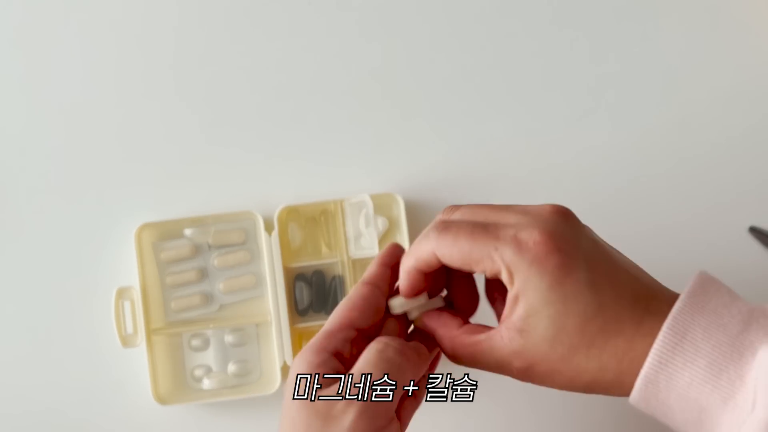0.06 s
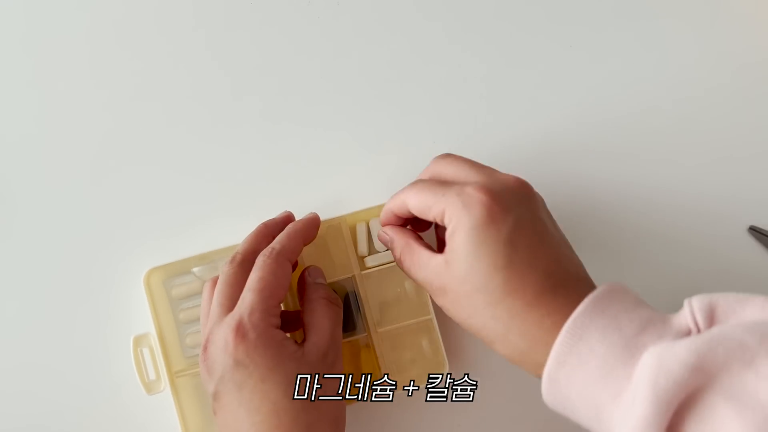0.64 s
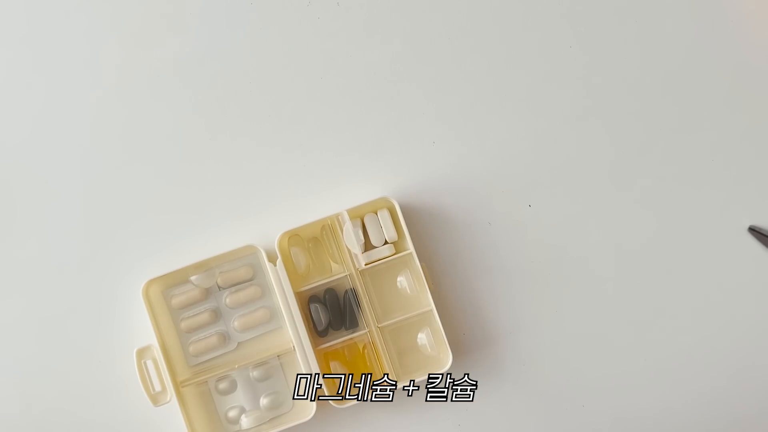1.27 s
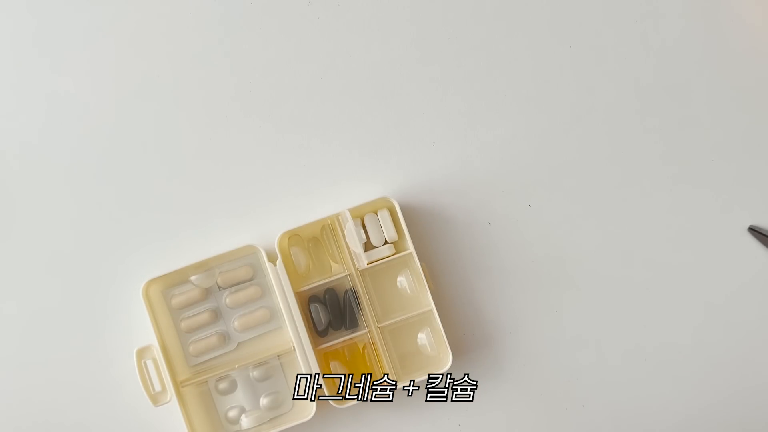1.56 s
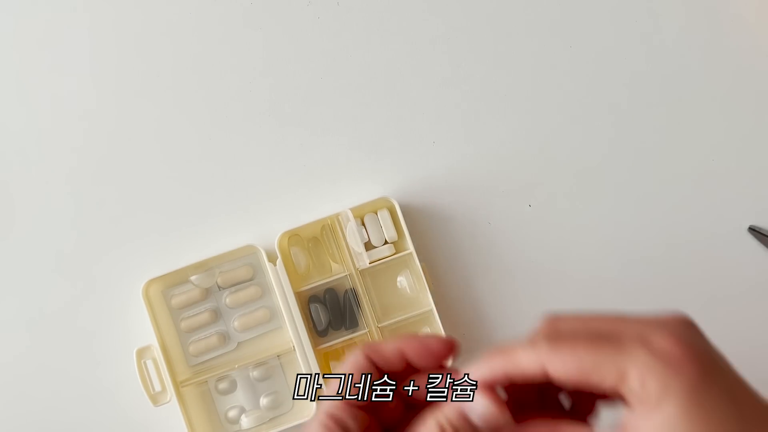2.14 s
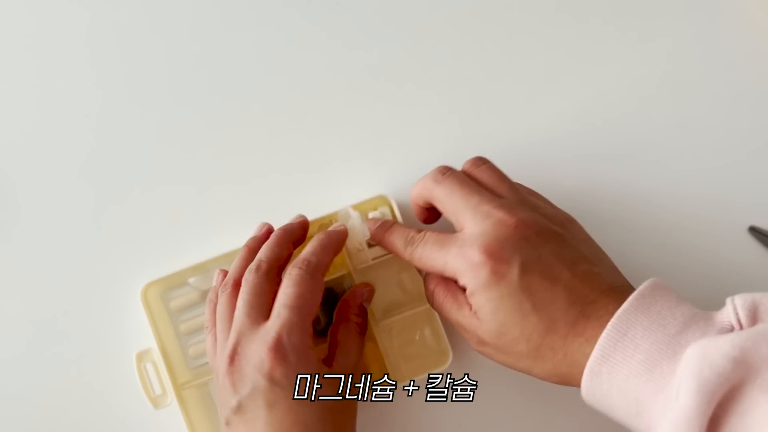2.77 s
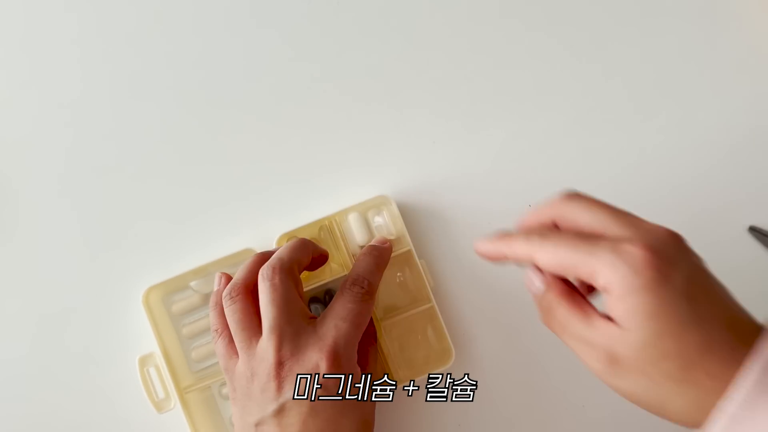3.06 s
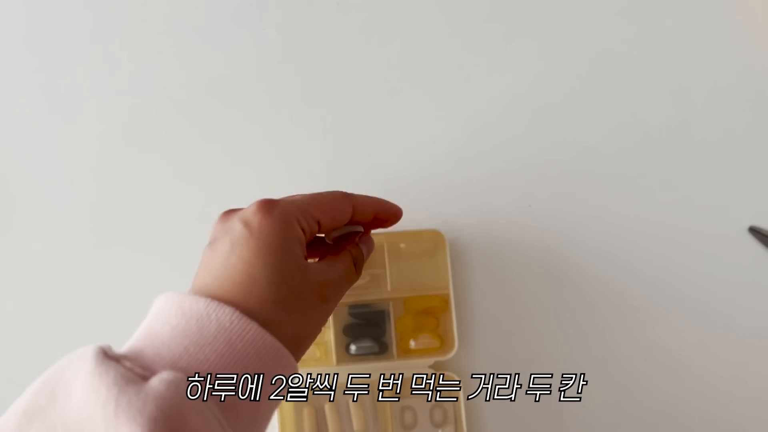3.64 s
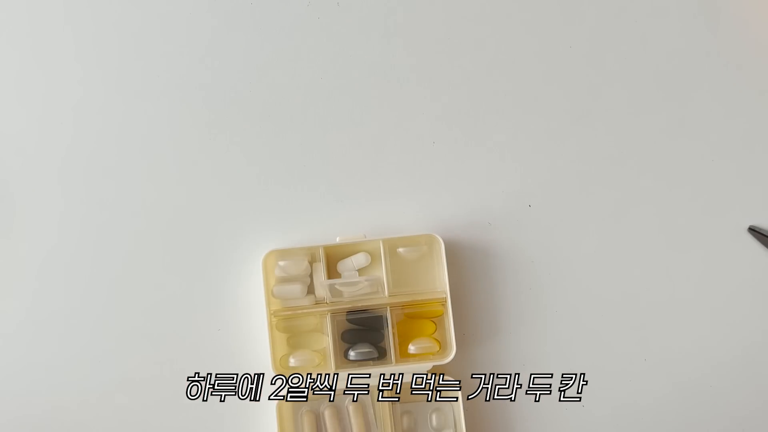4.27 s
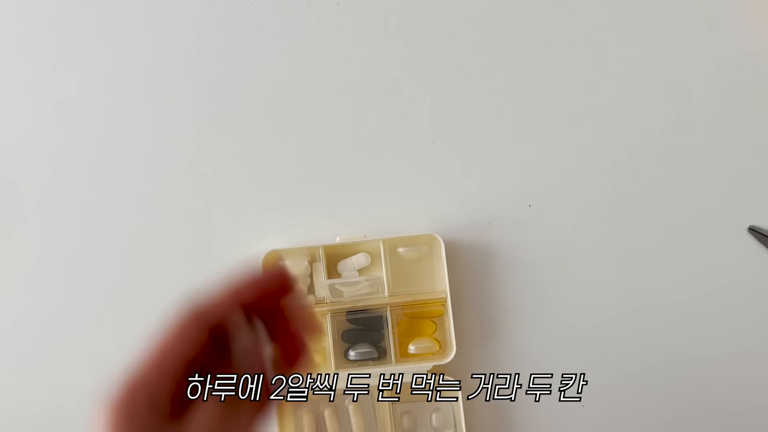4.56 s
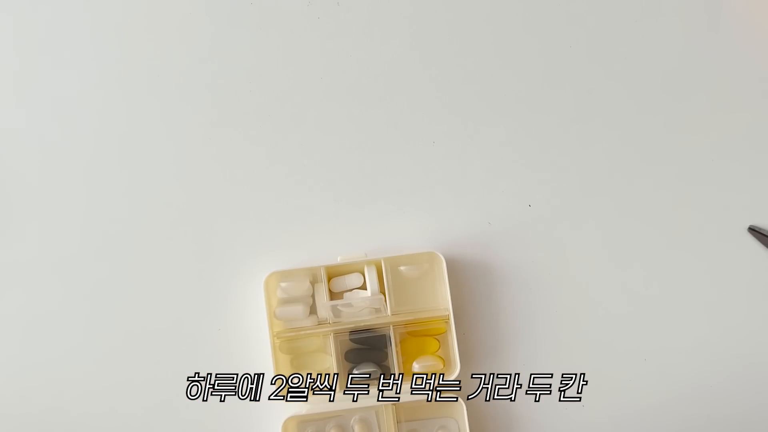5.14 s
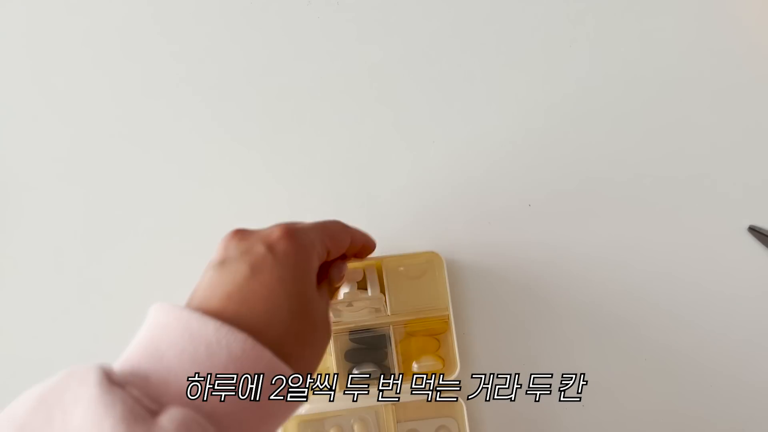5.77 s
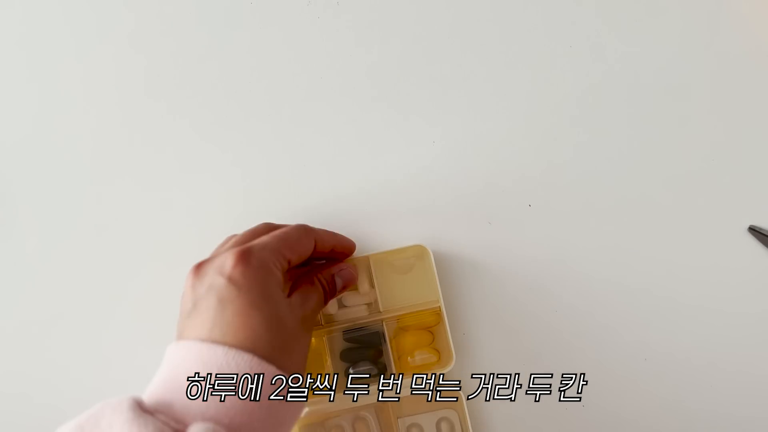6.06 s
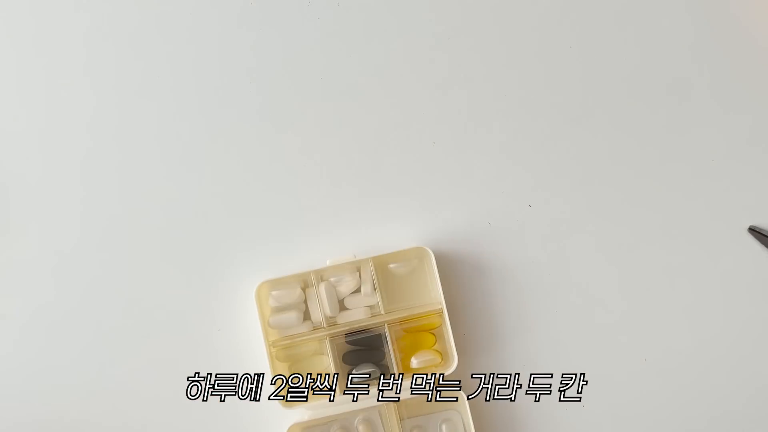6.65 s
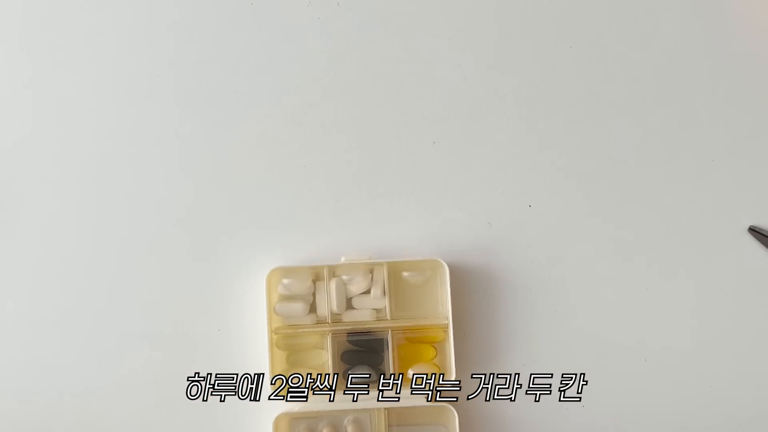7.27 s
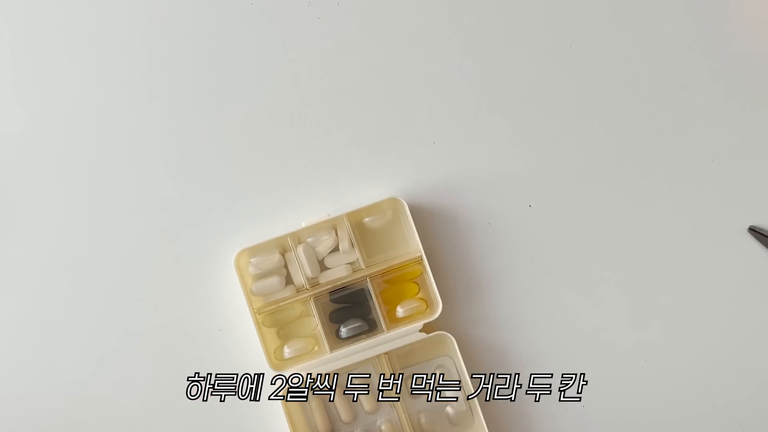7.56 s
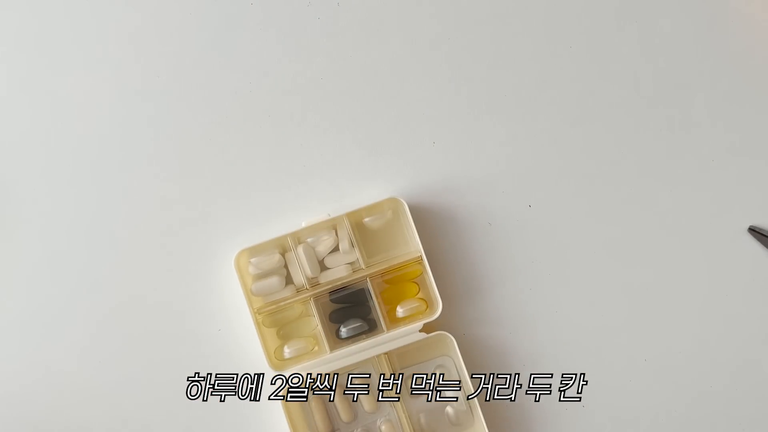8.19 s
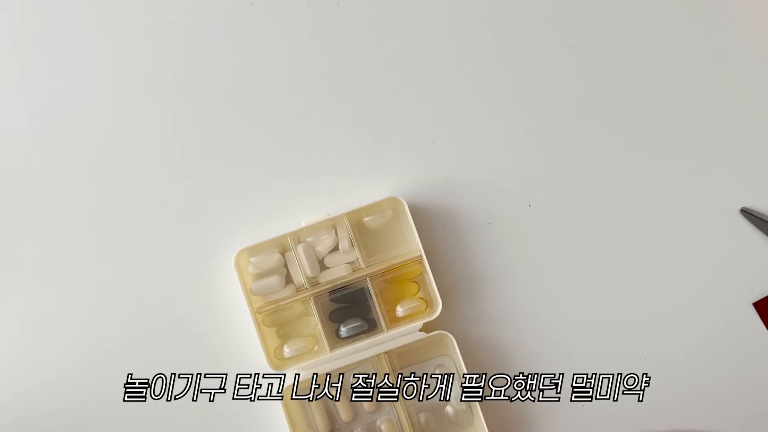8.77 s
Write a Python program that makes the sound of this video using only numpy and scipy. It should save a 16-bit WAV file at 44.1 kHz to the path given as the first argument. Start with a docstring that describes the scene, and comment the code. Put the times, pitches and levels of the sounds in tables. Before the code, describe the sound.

Pills rattle in a plastic bottle and click into a plastic organizer, with snapping lids, desk knocks and a brief foil crackle.

```python
"""Pills rattle in a plastic bottle and drop into a plastic organizer, close to the microphone.
Each hit is a tiny click; the air in the bottle rings too, lower while a palm covers the mouth.
Lids snap, the bottle and the organizer knock on the desk, and at the end the foil of a blister
pack crackles as it buckles. A small, dry room with a low, steady rumble answers every click."""
import sys
import numpy as np
from scipy import signal
from scipy.fft import rfft, irfft
from scipy.io import wavfile
from scipy.ndimage import uniform_filter1d

SR = 44100
rng = np.random.default_rng(int(sys.argv[2]) if len(sys.argv) > 2 else 0)


def waveform_to_disk(signal):
    """Save audio, clipped to [-1, 1], as 16-bit WAV at the path in sys.argv[1]."""
    frames = np.transpose(np.atleast_2d(signal))
    scaled = np.clip(frames, -1, 1) * 32767
    samples = np.round(scaled).astype(np.int16)
    wavfile.write(sys.argv[1], SR, samples)


N = 388944
TIME = np.arange(N) / SR
LEAD = SR // 500  # samples of run-up before each blow

# Levels are relative. A colour says how strong each frequency is; a higher tilt is brighter.
# A mode is a tone that a thing rings at; t60 is the time it takes to fade by 60 dB.
RUMBLE_COLOUR = [(15, -55.5), (25, -39.5), (108, 4), (175, -7), (416, -1.5), (591, -12), (734, -10),
                 (1230, -18.5), (1740, -16), (2220, -20.5), (4610, -24), (9840, -30), (11900, -41.5),
                 (14800, -36.5), (16000, -36.5)]  # background noise of the room: f/Hz, level/dB
BASS_GROWTH = [(0, 0), (5.5, -1), (7.2, 4.5), (8.8, 10)]  # the deepest rumble grows: t/s, level/dB
# bottle and organizer knocking on the desk: t/s, level/dB, centre f/Hz, spread/octaves, crack level/dB
DESK_KNOCKS = [(0.26, -40, 520, .5, -42.5), (0.891, -32.5, 404, 1.13, -48), (.924, -28, 345, 1.1, -45),
               (1.015, -40.5, 190, 0.77, -62), (1.117, -36, 452, 0.75, -52), (1.907, -6, 575, 1.32, -11.5),
               (1.937, -14.5, 518, 1.6, -13), (3.372, -24.5, 696, 0.37, -26.5), (6.199, -38, 805, .88, -34),
               (6.477, -31.5, 325, 1.3, -35), (6.817, -9.5, 813, 0.31, -12.5),
               (6.9126, -22.5, 413, 0.83, -20.5), (7.22, -37, 600, 1.8, -52),
               (7.278, -17.5, 412, 0.58, -27), (7.315, -25, 400, 0.48, -30.5),
               (7.364, -28.5, 464, 0.26, -34), (8.03, -36.5, 494, 1.46, -34), (8.193, -34, 530, .32, -57),
               (8.209, -32.5, 910, 0.58, -54)]
DESK_MODES = [(136.1, -6, 0.18), (214, 0.5, 0.056), (288, -6, 0.086), (373.4, 0, .075), (447, 0.5, 0.017),
              (554.3, 0.5, 0.054), (720, -3, 0.027), (769.5, 1.5, 0.03), (1019, 1, 0.043),
              (1222, -7, 0.088), (1419, -6, .05), (1950, -4, .04), (2260, 2, 0.041)]  # desk and box ringing together: f/Hz, level/dB, t60/s
KNOCK_COLOUR = [(150, -24.5), (500, 7), (1000, 5), (1500, 0.5), (2200, -4), (3000, -9), (4500, -5.5),
                (7000, -8.5), (9500, -7), (15000, -16)]  # the sharp crack that starts a knock: f/Hz, level/dB
DESK_PUSHES = [(0.922, -49, 0.023, 0.018), (1.12, -41.5, 0.012, 0.012), (7.295, -42.5, 0.0087, 0.081),
               (7.38, -40, 0.016, 0.043), (8.085, -41, .025, 0.041), (8.14, -47, 0.014, 0.015)]  # organizer sliding on the desk: peak t/s, level/dB, rise/s, fall/s
PUSH_COLOUR = [(150, -3), (380, 9), (560, 9), (800, -2.5), (1200, -4.5), (2200, -11), (3700, -8),
               (5500, -19.5), (9500, -19), (15000, -28.5)]  # one tiny slip on the desk: f/Hz, level/dB
# light ticks on the organizer, from pills landing and fingernails tapping the lids: t/s, level/dB
ORGANIZER_TICKS = [(0.3005, -36.5), (0.3337, -28.5), (0.3504, -14), (0.4111, -40), (0.4883, -20.5),
                   (0.502, -24), (0.5303, -28), (0.5451, -21), (0.5585, -38), (0.599, -20.5),
                   (0.6078, -15.5), (0.6525, -19), (2.3312, -15), (2.3395, -20), (2.5813, -16.5),
                   (2.6136, -25), (2.6408, -29), (2.7266, -27.5), (2.8077, -28.5), (2.8351, -25.5),
                   (2.9373, -25.5), (3.7734, -14.5), (3.7858, -8.5), (3.7897, -16), (3.8287, -16.5),
                   (3.8464, -20.5), (4.7868, -25), (4.8022, -19), (4.8505, -17), (5.7258, -20.5),
                   (5.7544, -30), (5.7834, -28.5), (5.857, -15.5), (6.0365, -28.5), (6.343, -39)]
ORGANIZER_COLOUR = [(150, -41), (400, -7), (1000, -20.5), (1700, -16), (2600, -9), (3800, -5), (5200, -0.5),
                    (7000, -1.5), (9500, -4.5), (15000, -11)]  # one tick on the organizer: f/Hz, level/dB
# small rustles, from pills settling or a lid slipping before it snaps: peak t/s, level/dB, rise/s, fall/s
ORGANIZER_RUSTLES = [(.352, -40.5, 0.02, 0.0088), (.665, -38, .008, .01), (2.338, -45, 0.0044, 0.011),
                     (2.584, -39, 0.0048, 0.018), (2.823, -48, 0.034, 0.009), (3.797, -28.5, 0.014, 0.023),
                     (4.832, -24, 0.013, 0.014), (5.745, -31.5, .01, 0.023), (6.041, -44.5, 0.012, .012),
                     (6.188, -40, 0.00378, .005), (7.191, -47, 0.032, .03)]
LID_SNAPS = [(3.3717, -11.5, 3, 1830), (3.739, -22, -1, 3080), (6.1985, -12, 0, 2960),
             (6.9137, -13, 3.5, 2170), (7.2198, -36, -4, 2390)]  # lid catches snapping: t/s, level/dB, tilt/(dB per octave), lid f/Hz
LID_COLOUR = [(150, -9.5), (400, -9), (1000, -11), (1700, -11), (2600, -8.5), (3800, -6), (5200, -9.5),
              (7000, -3.5), (9500, -3), (15000, -11.5)]  # the snap of a catch: f/Hz, level/dB
WALL_HITS = [(1.1312, -42.5), (1.16, -38), (1.2394, -30), (1.2661, -20.5), (1.3001, -16), (1.4219, -32.5),
             (1.4924, -38), (1.5108, -31.5), (1.6556, -40.5), (1.7896, -20), (1.8341, -21), (3.6663, -27),
             (3.9668, -32.5), (4.0583, -25.5), (4.1926, -21.5), (4.241, -31), (4.2965, -23), (4.336, -20.5),
             (4.3492, -25.5), (4.4974, -20.5), (4.5532, -31.5), (4.5971, -16), (4.6166, -22), (4.6241, -24),
             (4.6387, -19.5), (4.6745, -16), (4.7357, -38), (5.019, -23.5), (5.0911, -30), (5.1302, -25),
             (5.3536, -20.5), (5.3876, -19), (5.4135, -25), (5.4562, -14), (5.4664, -17.5), (5.4969, -13.5),
             (5.5523, -16), (5.5682, -20), (6.4779, -18.5), (6.5792, -14.5), (6.6358, -32), (8.063, -36.5)]  # single pills striking the bottle wall: t/s, level/dB
BOTTLE_COLOUR = [(150, -43), (400, -29.5), (800, -16.5), (1150, -10), (1700, -9), (2600, -9), (3800, 0),
                 (5200, -3.5), (7000, -3.5), (9500, -1), (15000, -7)]  # one hit on that wall: f/Hz, level/dB
# pills tumbling as the bottle moves: peak t/s, level/dB, rise/s, fall/s, air ring level/dB
PILL_TUMBLES = [(1.311, -12, .018, 0.027, -16), (1.5, -41.5, 0.032, 0.036, -24),
                (1.816, -25.5, 0.022, 0.022, -2), (1.925, -26, 0.0048, 0.021, -6),
                (3.675, -31.5, 0.0067, 0.013, 1.5), (4.01, -39, 0.017, 0.063, -16),
                (4.118, -26, 0.032, 0.049, 4.5), (4.345, -31.5, 0.012, 0.0069, -4),
                (4.42, -42, .012, 0.012, 3), (4.52, -47.5, 0.028, 0.031, 5.5),
                (4.634, -39, 0.015, 0.025, -6), (5.022, -34.5, .003, 0.016, -13),
                (5.18, -29.5, 0.036, 0.069, 3), (5.29, -41.5, .025, 0.066, 2.5),
                (5.511, -22.5, 0.031, 0.021, -1), (6.477, -30.5, .0042, .006, -7),
                (6.522, -15, .008, 0.026, -0.5), (7.4, -61, 0.033, 0.039, -6),
                (8.081, -47.5, .014, 0.013, 0)]
AIR_MODES = [(1142, -3.5, .07), (1199, -13, 0.031), (2700, -11.5, .013), (3253, -18, 0.013),
             (3460, -11, 0.022), (3770, -11.5, 0.02), (7110, -17, 0.01), (9850, -10, 0.0079)]  # air in the bottle: base f/Hz, level/dB, t60/s
PALM_MOVES = [(1.094, 1.472, 0.13), (3.964, 4.174, 0.16), (4.996, 5.313, .085)]  # a palm cups the bottle mouth: closing t/s, lifting t/s, lift time scale/s
BLISTER_CRACKS = [(8.3023, -33, 3.5), (8.3378, -27, 4), (8.3712, -25.5, 2), (8.3789, -15, 7), (8.4555, -32, 1),
                  (8.4633, -12.5, 4), (8.5405, -34, -9.5), (8.6983, -18.5, -5), (8.7354, -31.5, -10.5),
                  (8.7589, -30.5, -6)]  # foil buckling, and near 8.7 s the plastic dome of the pack clicking: t/s, level/dB, tilt/(dB per octave)
BLISTER_COLOUR = [(400, -22), (1000, -16), (1700, -19), (2600, -16.5), (3800, -5.5), (5200, -5),
                  (7000, 1.5), (9500, 8), (15000, -2)]  # one crack of the foil: f/Hz, level/dB
PACK_FLEXES = [(8.385, -37.5, .02, 0.013), (8.53, -46.5, 0.038, 0.05), (8.705, -28.5, .005, 0.015)]  # fingers bending the pack: peak t/s, level/dB, rise/s, fall/s
ECHO_FADE = [(150, 0.073), (600, 0.15), (3000, 0.12), (8000, 0.088), (15000, 0.061)]  # how long the room echoes: f/Hz, t60/s
STEREO_LIKENESS = [(100, .99), (400, 0.96), (1000, 0.44), (2500, 0.16), (8000, 0.083)]  # sound from all around: f/Hz, left-right likeness (1 = the same)
STEREO_BALANCE = [(500, -0.5), (1200, -2.5), (2500, -2.1), (5000, -2.5), (9000, -3.2), (14000, 1.5)]  # direct sound: f/Hz, left minus right level/dB
STEREO_PHASE = [(200, 0.43), (500, -.3), (1200, -1.4), (2200, -0.1), (4000, 0.74), (8000, 1.69),
                (14000, 1.78)]  # direct sound: f/Hz, lead of left over right/radians


def amp(db):
    """Turns decibels into a factor to multiply by."""
    return 10 ** (np.asarray(db) / 20)


def read(points, hz):
    """Looks up hz in a table, joining its points by straight lines over log frequency."""
    f, value = np.transpose(points)
    return np.interp(np.log(hz + 1), np.log(f), value)


def unit(x):
    """Scales a sound to the energy of one millisecond at full level."""
    return x * np.sqrt(SR / 1000 / (np.sum(x ** 2) + 1e-20))


def add(mix, s, sound):
    """Adds a sound to the mix, starting at s seconds."""
    part = mix[max(round(s * SR), 0):][:len(sound)]
    part += sound[:len(part)]


def high_pass(x, edge_hz):
    """Turns down the bass below edge_hz."""
    return signal.sosfilt(signal.butter(2, edge_hz, "high", fs=SR, output="sos"), x)


def diffuse(z, hz):
    """Makes two unrelated spectra alike in the bass, as at two close microphone openings."""
    same = np.clip(read(STEREO_LIKENESS, hz), -1, 1)[:, None]
    return np.array([z[0], same * z[0] + np.sqrt(1 - same ** 2) * z[1]])


def rumble(level_db):
    """Low room noise with a faint hiss; its deepest part grows toward the end."""
    hz, t, z = signal.stft(rng.standard_normal((2, N)), SR, nperseg=2048)
    swell_db = np.interp(t, *np.transpose(BASS_GROWTH)) * np.exp(-(hz[:, None] / 130) ** 2)
    spectrum = diffuse(z, hz) * amp(read(RUMBLE_COLOUR, hz)[:, None] + swell_db)
    noise = high_pass(signal.istft(spectrum, SR, nperseg=2048)[1][:, :N], edge_hz=72)
    return amp(level_db) * noise / noise.std()


def click(colour, tilt_db, ripple_db, size=1024):
    """One contact: a short pulse whose colour varies with the spot that is struck."""
    hz = np.fft.rfftfreq(size, 1 / SR)
    ripple = uniform_filter1d(rng.standard_normal(len(hz)), size=24)
    db = read(colour, hz) + tilt_db * np.log2(np.maximum(hz, 2000) / 5000)
    db += ripple_db * np.tanh(ripple / ripple.std())
    log_gain = np.log(amp(np.r_[db, db[-2:0:-1]]))
    pulse = np.fft.ifft(np.exp(np.conj(signal.hilbert(log_gain)))).real  # starts sharply, then fades
    return unit(high_pass(pulse, edge_hz=190))  # small things give off little bass


def chatter(chatter_db, chatter_s, size=1024):
    """A thin wall chatters briefly, which spreads a blow in time and colours it a little."""
    blow = rng.standard_normal(size) * np.exp(-np.arange(size) / SR / chatter_s)
    blow *= amp(chatter_db) / np.linalg.norm(blow)
    blow[0] = 1
    spectrum = rfft(blow)
    flattened = irfft(spectrum / abs(spectrum) ** 0.63, size)
    return np.roll(flattened, LEAD)[:size // 2]


def contacts(rows, colour, ripple_db, chatter_db, chatter_s):
    """One click, smeared by chatter, for each row of t/s, level/dB, tilt/(dB per octave)."""
    out = np.zeros(N)
    for s, db, tilt_db in rows:
        hit = np.convolve(chatter(chatter_db, chatter_s), click(colour, tilt_db, ripple_db))
        add(out, s - LEAD / SR, amp(db) * unit(hit))
    return out


def tumble(row, colour, per_s, spread_db, kinds=5):
    """Many small collisions swell up and die away. Gives the start time and the sound."""
    s, db, rise, fall = row
    t = np.arange(-6 * rise, 6 * fall, 1 / SR)
    swell = np.exp(np.where(t < 0, t / rise, -t / fall))
    grains = np.zeros(len(t))
    for _ in range(kinds):
        struck = rng.random(len(t)) < per_s / kinds / SR
        strength = amp(spread_db * np.minimum(rng.exponential(1, len(t)), 3))
        grain = np.convolve(chatter(chatter_db=12, chatter_s=.0006), click(colour, 0, ripple_db=3.1))
        hits = struck * strength * rng.choice([-1, 1], len(t))
        grains += signal.oaconvolve(hits, grain)[LEAD:LEAD + len(t)]
    grains *= swell
    return s + t[0], amp(db) * grains * np.linalg.norm(swell) / (np.linalg.norm(grains) + 1e-9)


def desk(rebound_s=0.0072, rebound_db=-5):
    """A knock is a crack plus the desk modes near its centre frequency; a push is a run of tiny slips."""
    out, t = np.zeros(N), np.arange(SR // 4) / SR
    hz, mode_db, t60 = np.transpose(DESK_MODES)[:, :, None]
    phase = 1.28 * (-1) ** np.arange(len(DESK_MODES))[:, None]
    attack, fade = 1 - np.exp(-t / 0.000072), np.exp(-np.log(1000) * t / t60)
    for s, db, centre_hz, spread, _ in DESK_KNOCKS:
        weight = amp(mode_db) * np.exp(-.5 * (np.log2(hz / centre_hz) / spread) ** 2)
        detune = 1 + .012 * rng.standard_normal(hz.shape)
        modes = weight * np.sin(2 * np.pi * hz * detune * t + phase) * fade
        add(out, s, amp(db + 2.5) * unit(high_pass(modes.sum(0) * attack, edge_hz=150)))
    for row in DESK_PUSHES:
        add(out, *tumble(row, PUSH_COLOUR, per_s=4900, spread_db=2))
    cracks = [(s, crack_db, 0) for s, *_, crack_db in DESK_KNOCKS]
    # what is set down lands on one edge, then on the other
    cracks += [(s + rebound_s, db + rebound_db, tilt_db) for s, db, tilt_db in cracks]
    return out + contacts(cracks, KNOCK_COLOUR, ripple_db=6.5, chatter_db=11.5, chatter_s=0.0023)


def bouncing(rows, neutral_db, tilt_per_db, bounce_s, loss_db, bounces=2):
    """Weaker bounces follow each hit at uneven gaps; brightness depends on how hard each one is."""
    hits = []
    for s, db in rows:
        for gap, loss in rng.uniform(.5, 1.5, (bounces + 1, 2)):
            hits.append((s, db, tilt_per_db * (db - neutral_db)))
            s, db = s + gap * bounce_s, db - loss * loss_db
    return hits


def organizer():
    """Pills and fingernails tick, pills settle, a lid slips, and snapping catches ring the lids."""
    hits = bouncing(ORGANIZER_TICKS, neutral_db=-24.5, tilt_per_db=0.46, bounce_s=0.0082, loss_db=10.5)
    out = contacts(hits, ORGANIZER_COLOUR, ripple_db=10.0, chatter_db=-0.5, chatter_s=0.00106)
    for row in ORGANIZER_RUSTLES:
        add(out, *tumble(row, ORGANIZER_COLOUR, per_s=1100, spread_db=7.5))
    for *row, lid_hz in LID_SNAPS:
        snap = contacts([row], LID_COLOUR, ripple_db=3.0, chatter_db=8, chatter_s=.0004)
        lid_ring = signal.lfilter(*signal.iirpeak(lid_hz, Q=4, fs=SR), snap + 1e-18)
        out += snap + amp(9.5) * lid_ring
    return out


def bottle():
    """Pills strike and slide on the wall, and the air inside rings."""
    hits = bouncing(WALL_HITS, neutral_db=-39, tilt_per_db=-0.11, bounce_s=0.012, loss_db=12.5)
    wall = contacts(hits, BOTTLE_COLOUR, ripple_db=7.5, chatter_db=6.0, chatter_s=0.001)
    drive = wall.copy()
    for s, db, rise, fall, ring_db in PILL_TUMBLES:
        crowd = amp(.45 * (db + 29.5))  # louder tumbles set more pills moving
        start, sound = tumble((s, db, rise, fall), BOTTLE_COLOUR, per_s=1700 * crowd, spread_db=7.5)
        add(wall, start, amp(-3.0) * sound)
        add(drive, start, amp(ring_db) * sound)
    return wall + bottle_air(drive)


def palm_pitch(open_factor=1.025, cupped_factor=0.631, close_s=.11):
    """The pitch of the air sinks as the palm closes on the mouth and glides back up as it lifts."""
    cupped = np.zeros(N)
    for close, lift, lift_s in PALM_MOVES:
        closing = np.clip((TIME - close) / close_s, 0, 1)
        cupped += closing * np.exp(-np.maximum(TIME - lift, 0) / lift_s)
    return open_factor + (cupped_factor - open_factor) * np.minimum(cupped, 1)


def ring(x, hz, t60):
    """One mode, set ringing by x, whose pitch follows the curve hz."""
    phase = (2 * np.pi * (np.cumsum(hz / SR) % 1)).astype(np.float32)
    turn = np.cos(phase) + 1j * np.sin(phase)
    decay = np.exp(-np.log(1000) / (t60 * SR))
    gain = np.sqrt(2 * (1 - decay * decay))  # the ring holds about the energy of the click
    return (turn * signal.lfilter([gain], [1, -decay], x * turn.conj() + 1e-18)).real


def bottle_air(drive):
    """The air in the bottle rings: freely when open, lower and shorter under the palm."""
    pitch = palm_pitch()
    cover = np.clip((1 - pitch) / .3, 0, 1)
    glide_below_hz = 5000  # the palm hardly shifts the treble modes
    opened = sum(amp(db) * ring(drive * (1 - cover), hz * pitch ** (hz < glide_below_hz), t60)
                 for hz, db, t60 in AIR_MODES)
    damped = sum(amp(db) * ring(drive * cover, hz * pitch, t60 / 2)
                 for hz, db, t60 in AIR_MODES[::4])  # fingers absorb most modes
    return amp(-0.5) * opened + amp(-2.0) * damped


def blister():
    """The foil buckles in thin, sharp cracks, the plastic dome of the pack clicks once, and the pack crinkles
    faintly as it bends."""
    out = contacts(BLISTER_CRACKS, BLISTER_COLOUR, ripple_db=7.5, chatter_db=-2.5, chatter_s=0.0013)
    for row in PACK_FLEXES:
        add(out, *tumble(row, BLISTER_COLOUR, per_s=450, spread_db=6))
    return out


def room(x, wet_db, build_s, patterns=3):
    """Near walls send back quick, dense echoes; several patterns alternate so no steady tone rings."""
    out = np.zeros((2, N))
    for k in range(patterns):
        hz, t, z = signal.stft(rng.standard_normal((2, SR // 4)), SR, nperseg=256)
        fade = np.exp(-np.log(1000) * t / read(ECHO_FADE, hz)[:, None])
        tail = signal.istft(diffuse(z, hz) * fade, SR, nperseg=256)[1]
        tail *= np.minimum(np.arange(tail.shape[1]) / SR / build_s, 1) ** 2
        share = np.sqrt(2 / patterns) * np.cos(np.pi * (7 * TIME + k / patterns))
        out += signal.oaconvolve((x * share)[None], tail / np.linalg.norm(tail[0]), axes=1)[:, :N]
    return amp(wet_db) * out


def direct_sound(x):
    """Sound reaches the two microphone openings out of step, mostly a little louder on the right."""
    hz = np.fft.rfftfreq(N, 1 / SR)
    left = amp(read(STEREO_BALANCE, hz) / 2) * np.exp(.5j * read(STEREO_PHASE, hz))
    return irfft(rfft(x) * np.array([left, 1 / left]), N)


def microphone_dip(x, centre_hz, width_hz, depth_db):
    """The microphone has a dip in the upper treble."""
    hz = np.fft.rfftfreq(N, 1 / SR)
    dip_db = -depth_db * np.exp(-((hz - centre_hz) / width_hz) ** 2)
    return irfft(rfft(x) * amp(dip_db), N)


def scene():
    """The close sounds and their echoes, over the rumble of the room."""
    near = organizer() + bottle() + blister() + desk()
    heard = direct_sound(near) + room(near, wet_db=-8.0, build_s=0.0018)
    return microphone_dip(heard, centre_hz=11835, width_hz=640, depth_db=12.5) + rumble(level_db=-57)


def record(dry):
    """Rounds off the sharpest peaks, then cuts the very highest treble."""
    ceiling, edge_hz = .8, 16250
    rounded = dry / (1 + (dry / ceiling) ** 4) ** (1 / 4)
    low_pass = signal.firwin(301, edge_hz, window=("kaiser", 10), fs=SR)
    return signal.oaconvolve(rounded, low_pass[None], "same")


dry = scene()
out = record(dry)
waveform_to_disk(out)
```